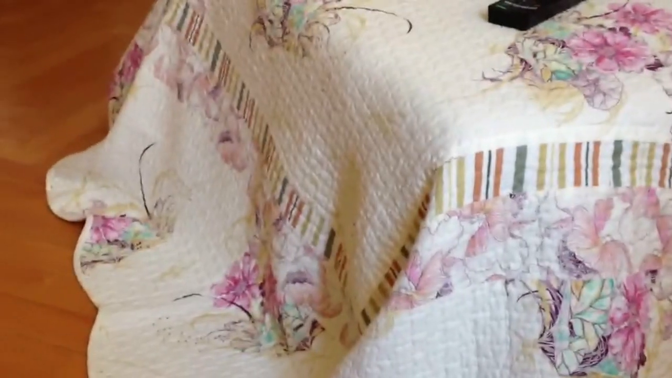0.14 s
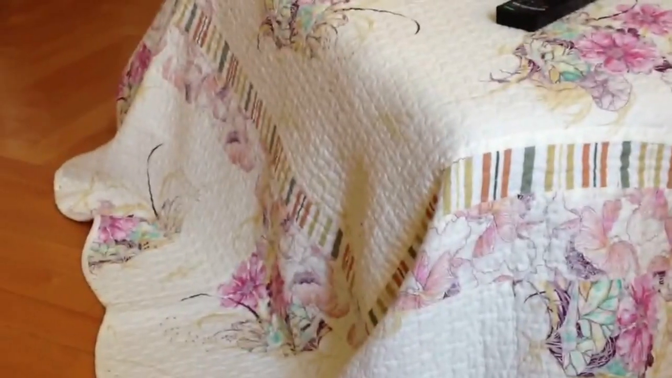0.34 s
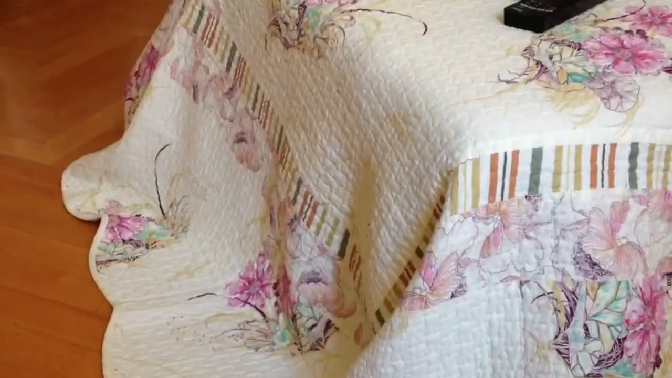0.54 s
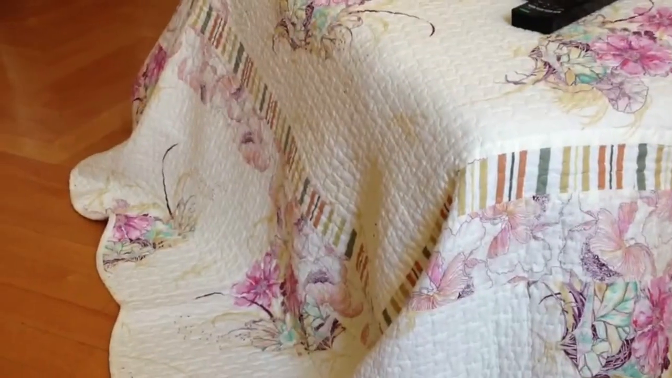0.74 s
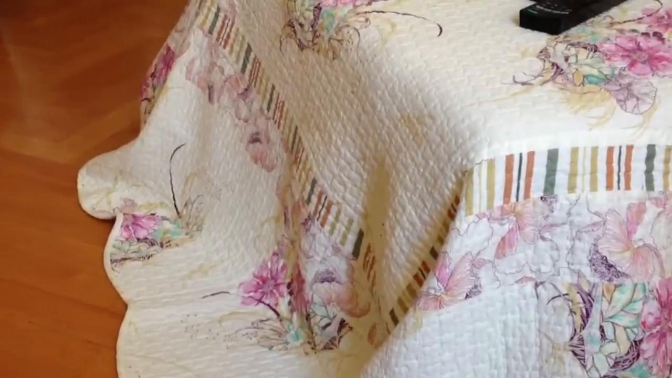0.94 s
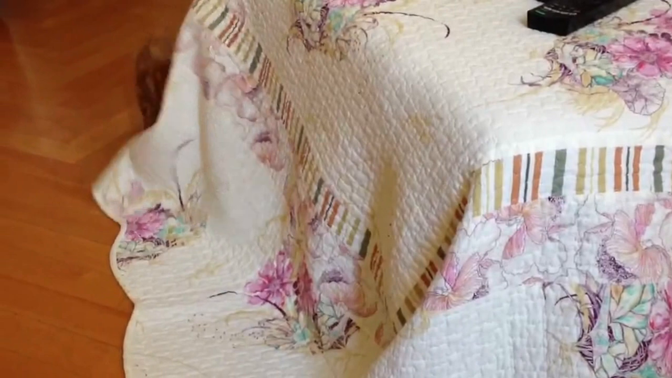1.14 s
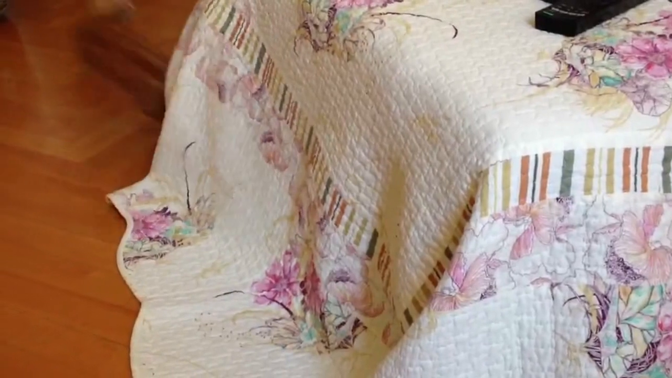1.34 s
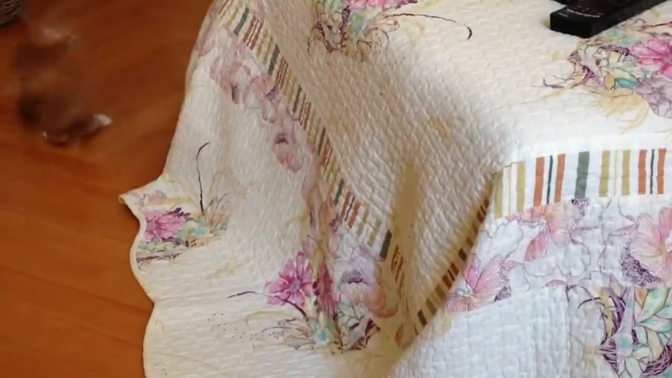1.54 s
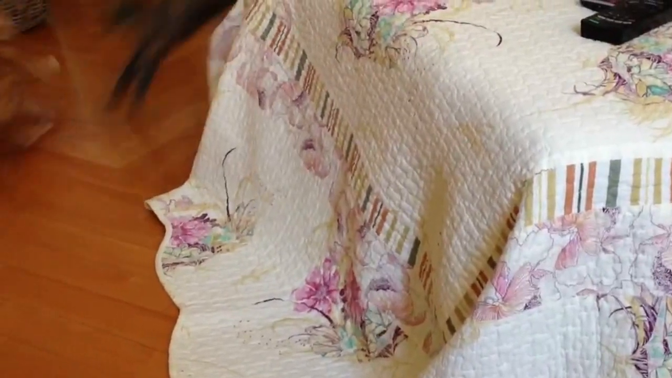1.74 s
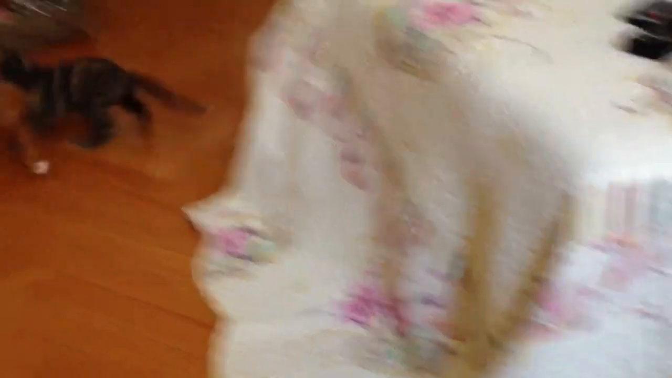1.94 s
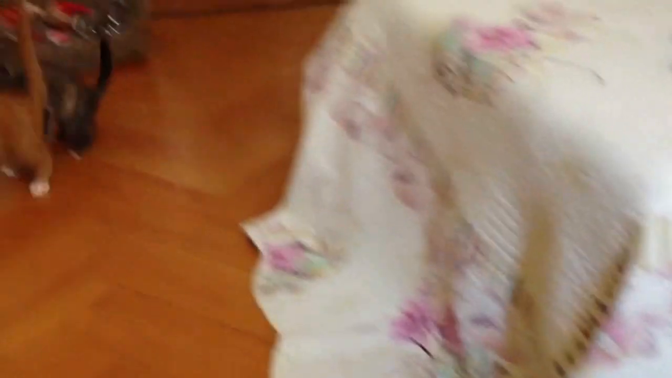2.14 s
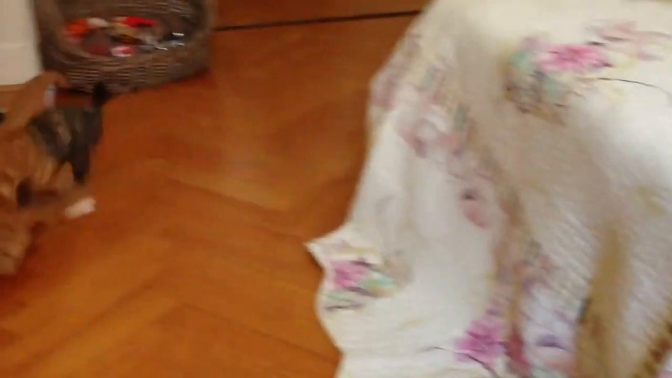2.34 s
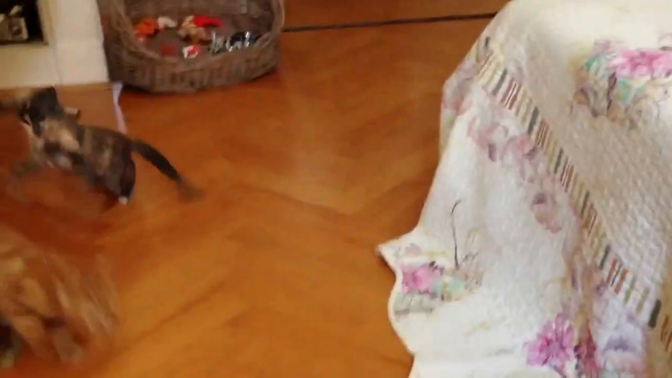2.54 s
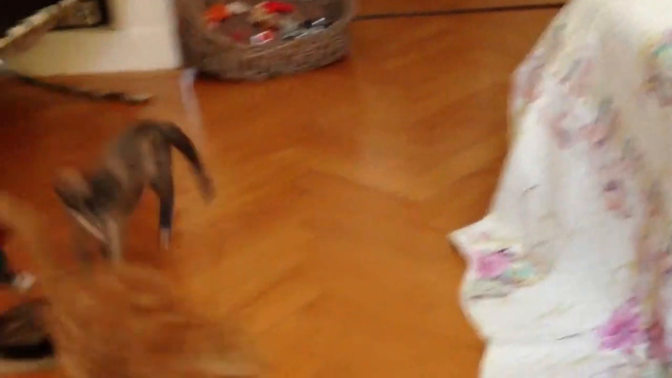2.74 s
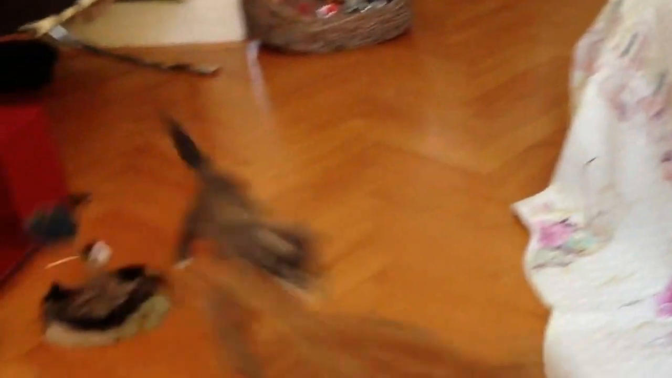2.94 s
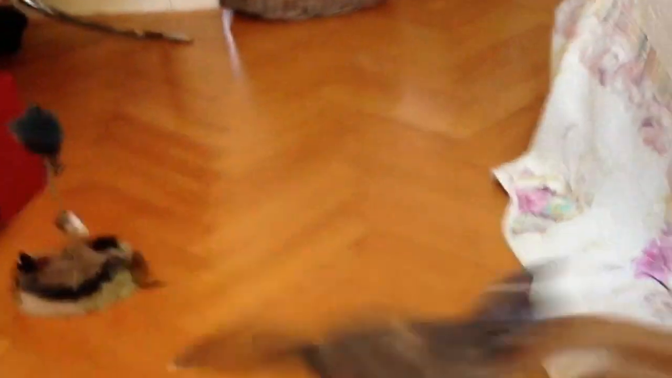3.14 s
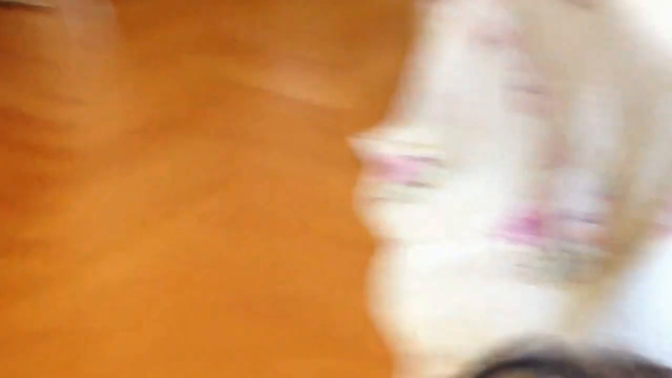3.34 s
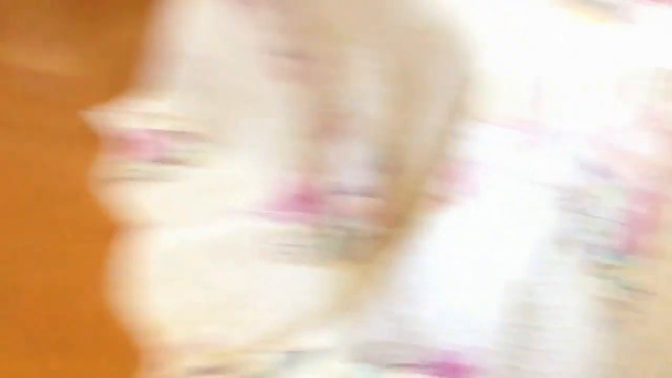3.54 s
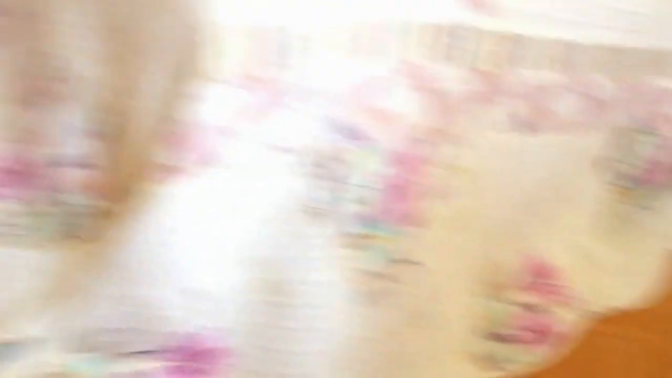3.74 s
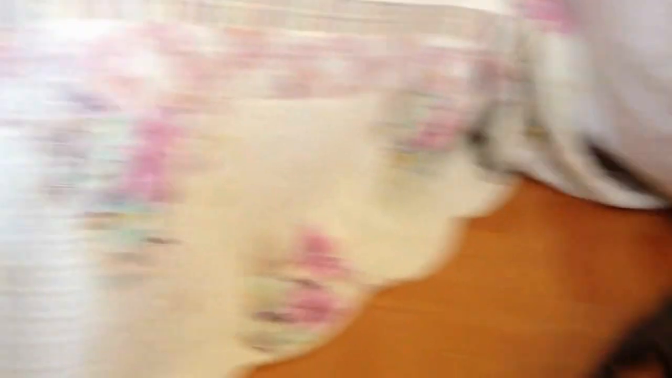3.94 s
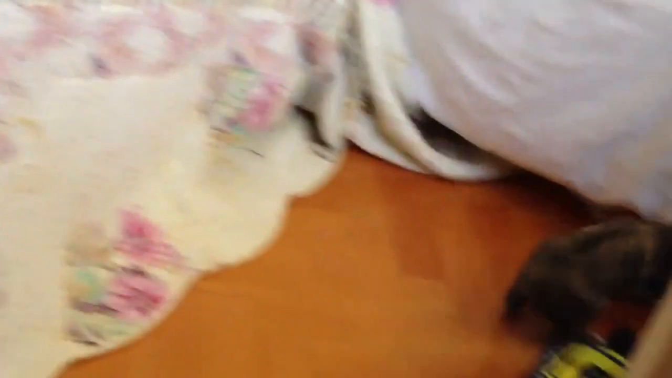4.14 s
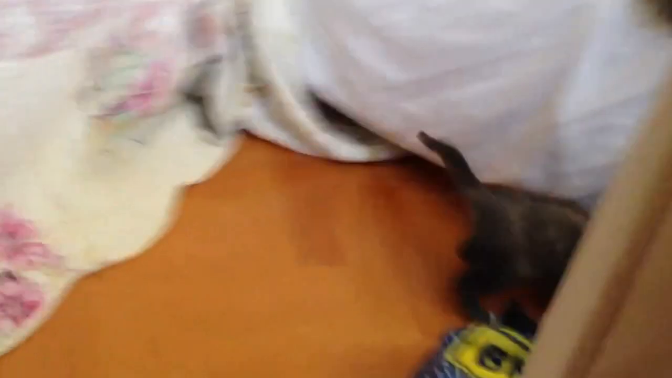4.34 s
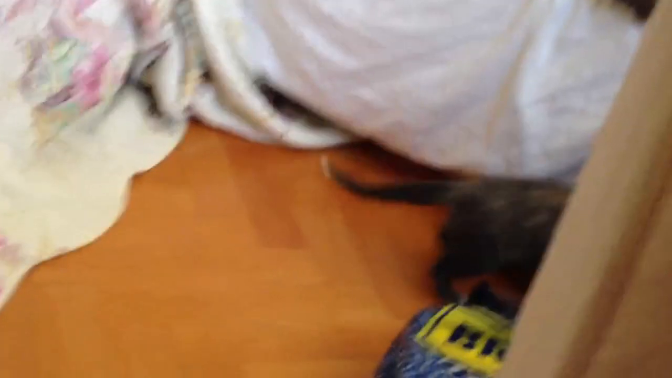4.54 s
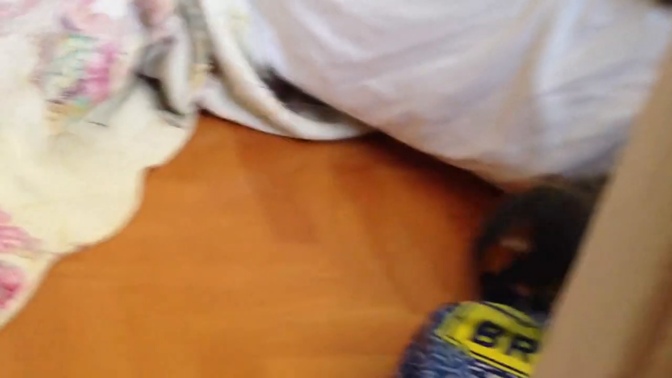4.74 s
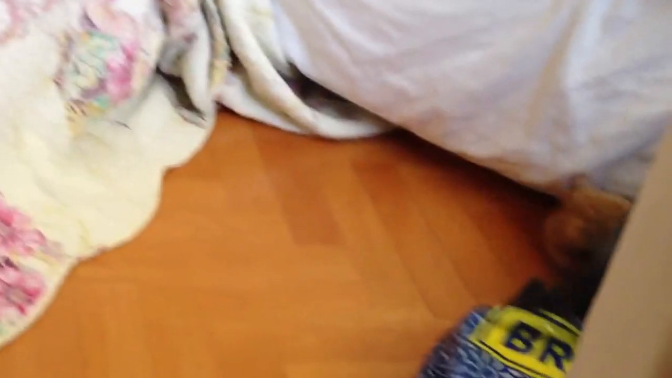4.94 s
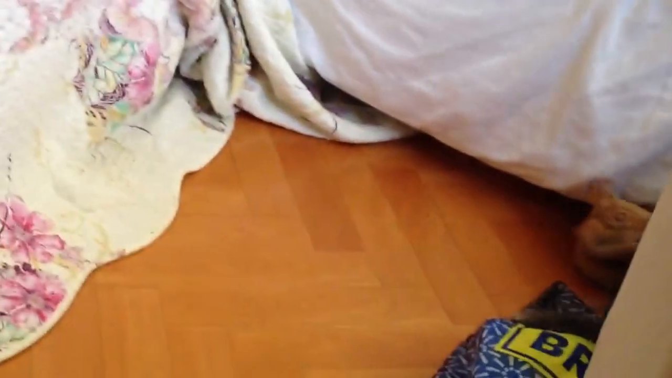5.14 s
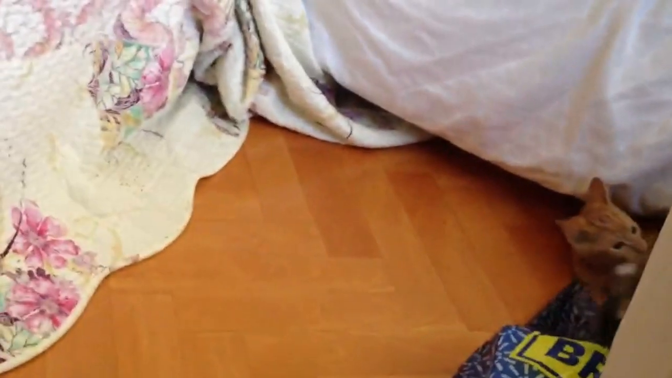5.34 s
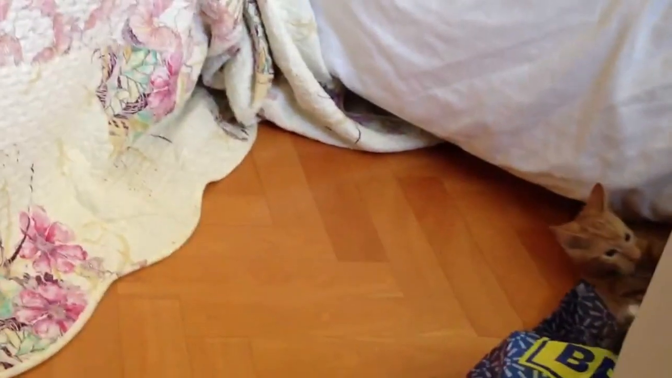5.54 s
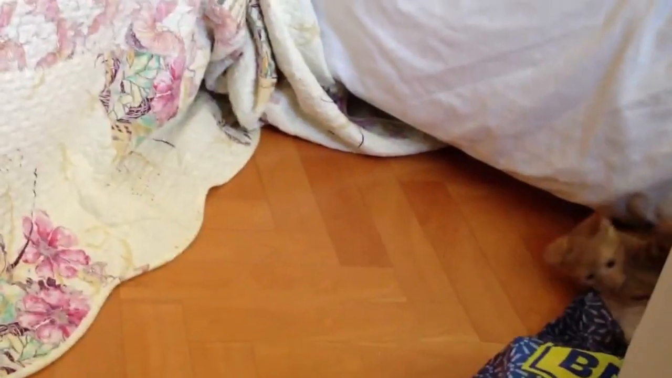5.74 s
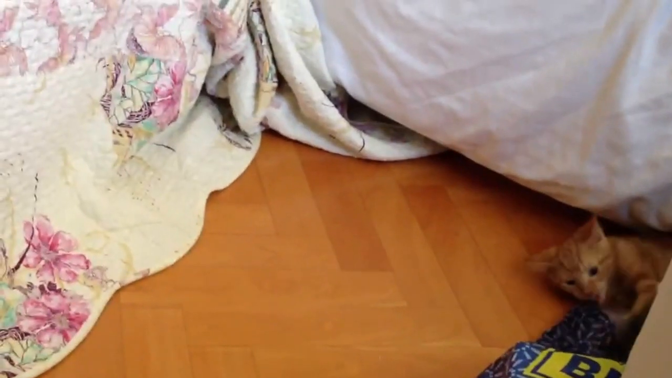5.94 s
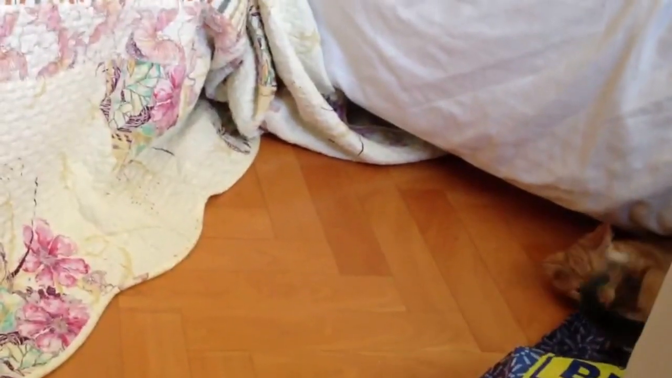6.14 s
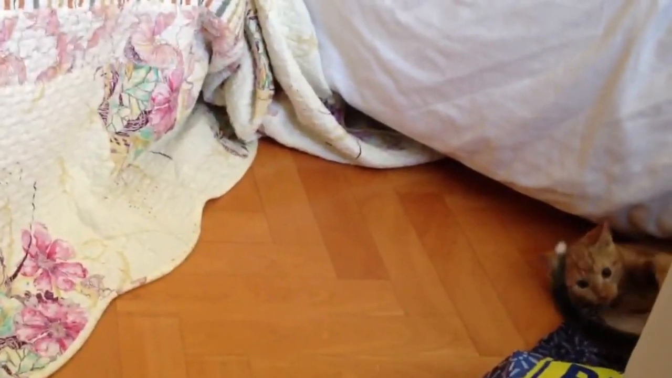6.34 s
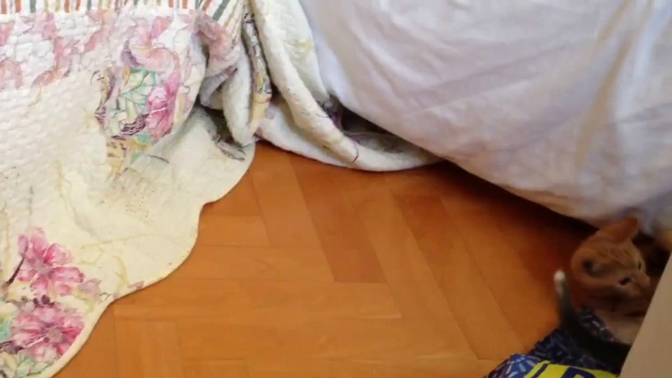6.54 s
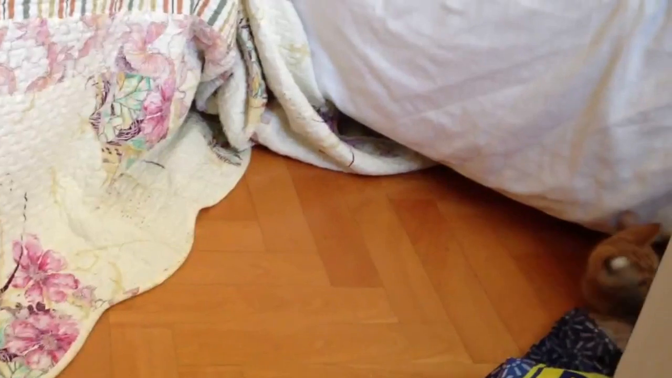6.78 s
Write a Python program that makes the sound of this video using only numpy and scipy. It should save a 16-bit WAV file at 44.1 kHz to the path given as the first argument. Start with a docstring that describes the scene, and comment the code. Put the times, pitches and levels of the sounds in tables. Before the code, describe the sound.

A small, quiet room with a parquet floor and short reverberation, picked up by a camera's small microphone over low, steady hiss. In the first 0.4 s, three faint finger taps touch the camera body; then just hiss. From about 1.05 s kittens burst out: thin claw scratches, quilt tugs and a flurry of rapping paws. The steps thin, then hit harder in a cluster at 1.8-1.95 s. Lighter, scattered steps follow, with more scratches near 2.7 s. From 2.64 s, crisp, bright cloth snaps and threadlike rustling come close, over galloping thuds; a short hoarse skid squeaks at 2.93 s. The strongest cloth crack and rub comes around 3.64 s, among heavier landings until 3.9 s. Cloth crackles fade by 4.6 s. Soft swishes swell around 4.9-5.5 s and 5.95 s, with isolated ticks and one faint knock. Muffled finger taps patter at 6.1-6.55 s, ending in hiss.

```python
"""A small, quiet room with a parquet floor, heard through a camera's small microphone over steady hiss.
First fingers tap faintly on the camera body: a few struck modes. Kittens then burst out from under a
quilt and gallop over the floor: shaped noise for claws, ringing boards for pads, grains for cloth.
Cloth drags close by as the camera turns after them, and a paw skids once: a gliding, uneven tone.
Last come soft swishes of fine grains, a few cloth ticks and more finger taps."""
import sys
import numpy as np
from scipy import signal
from scipy.fft import rfft, irfft
from scipy.io import wavfile

SR = 44100
rng = np.random.default_rng(int(sys.argv[2]) if len(sys.argv) > 2 else 0)


def log_audio(samples):
    """Write samples as a 16-bit WAV file to the path given in sys.argv[1]."""
    # one column per channel
    frames = np.atleast_2d(samples).T
    # limit to full scale, then quantise
    limited = np.clip(frames, -1, 1)
    pcm = np.round(limited * 32767).astype(np.int16)
    wavfile.write(sys.argv[1], SR, pcm)


N = 300321
TIME = np.arange(N) / SR

# Event levels in the tables are before each function's own trims; spectra are relative.


def amp(db):
    """Decibels to gain."""
    return 10 ** (np.asarray(db) / 20)


def unit(x):
    """Scales to rms 1."""
    return x / np.sqrt(np.mean(x ** 2) + 1e-20)


def read(points, hz):
    """Reads a table on a log-frequency axis."""
    f, value = np.transpose(points)
    return np.interp(np.log(hz + 1), np.log(f), value)


def level(rows, axis=1):
    """Gain over time from a column of dB, practically silent outside its span."""
    rows = np.asarray(rows)
    return amp(np.interp(TIME, rows[:, 0], rows[:, axis], left=-140, right=-140))


def strokes(rows):
    """Gain of strokes that swell to a peak and die away, evenly in dB; their powers add."""
    power = 0
    for s, db, rise, fall in rows:
        twenties_below_peak = np.maximum((s - TIME) / rise, (TIME - s) / fall).clip(0, 10)
        power = power + amp(db - 20 * twenties_below_peak) ** 2
    return np.sqrt(power)


def add(mix, s, sound):
    """Mixes a sound in at s seconds."""
    part = mix[max(round(s * SR), 0):][:len(sound)]
    part += sound[:len(part)]


def colour(x, points, centre_hz=1000, focus_db=0):
    """Gives x a spectrum, optionally gathered round a centre (dB lost per octave squared); rms 1."""
    hz = np.fft.rfftfreq(len(x), 1 / SR)
    octaves = np.log2((hz + 1) / centre_hz)
    gain = amp(read(points, hz) - focus_db * octaves ** 2)
    return unit(irfft(rfft(x) * gain, len(x)))


def wander(rate_hz):
    """Smooth random drift of rms 1, its spectrum falling away towards and above the rate."""
    hz = np.fft.rfftfreq(N, 1 / SR)
    return unit(irfft(rfft(rng.standard_normal(N)) * np.exp(-(hz / rate_hz) ** 2), N))


def grains(per_s, spread_db):
    """Random clicks, rms 1: a positive spread makes a few larger, a negative one a few smaller."""
    size = amp(spread_db * np.minimum(rng.exponential(1, N), 5))
    return unit(size * rng.choice([-1, 1], N) * (rng.random(N) < per_s / SR))


def ring(modes, t):
    """A struck body's modes, each dying by 60 dB in its t60."""
    return sum(amp(db - 60 * t / t60) * np.sin(2 * np.pi * hz * t) for hz, db, t60 in modes)


# finger taps on the camera body, at the microphone: t/s, level/dB, centre f/Hz
FINGER_TAPS = [(0.048, -54, 889.7), (0.152, -56.5, 803.8), (0.386, -61.5, 843), (6.079, -62.5, 623.4),
               (6.112, -59.5, 346.6), (6.194, -58.5, 357), (6.218, -67, 310), (6.244, -64, 328),
               (6.258, -63, 344.4), (6.286, -64.5, 353), (6.331, -61.5, 303.7), (6.548, -64, 1100)]
# modes of the camera body: f/Hz, level/dB, t60/s
CAMERA_MODES = [(366.84, 2, 0.02712), (560.48, 5.5, 0.02378), (811.49, 7.5, 0.02357),
                (921.23, -5.5, 0.0272), (1707, -5, 0.0267)]


def taps(gain_db=3, focus_db=7, rise=0.002394):
    """Fingers shift on the camera body, which rings briefly; each centre favours the modes near it."""
    out, t = np.zeros(N), np.arange(4096) / SR
    for s, db, centre_hz in FINGER_TAPS:
        modes = [(hz, mode_db - focus_db * np.log2(hz / centre_hz) ** 2, t60)
                 for hz, mode_db, t60 in CAMERA_MODES]
        tap = ring(modes, t) * (1 - np.exp(-t / rise))
        add(out, s, amp(db + gain_db) * tap / abs(tap).max())
    return out


# level of the murmur of many light steps, out on the parquet: t/s, level/dB
SCAMPER_LEVEL = [(1.02, -83), (1.13, -57), (1.7, -55), (2.3, -53.5), (2.95, -52), (3.35, -59), (3.9, -55),
                 (4.2, -76), (4.7, -77)]
# modes of the parquet, also stirred by the thuds: f/Hz, level/dB, undamped t60/s
FLOOR_MODES = [(80, -8, .45), (98, -2, 0.16914), (128.58, -4, 0.07), (159, -1, 0.085), (208, 2, 0.1),
               (263.13, 0, 0.11272), (317.09, -0.5, 0.10643), (388, 1, 0.086), (490, -10, 0.1535),
               (667.97, 0, 0.10548)]
# spectrum of claws and quilt, also used for scratches and tugs: f/Hz, level/dB
CLAW_AND_QUILT_TONE = [(100, 14.5), (300, -9), (1500, 1.5), (3000, 2.5), (4500, 2), (5500, -0.5),
                       (9000, -5), (15000, -7)]


def scamper(gain_db=-5, claws_db=-13):
    """Many light steps keep the floor murmuring, and their claws tick faintly on the varnish."""
    boards = [(hz, db, t60 / 2) for hz, db, t60 in FLOOR_MODES]  # damped by the feet that stand on them
    footfalls = grains(per_s=110, spread_db=0.5)
    steps = signal.fftconvolve(footfalls, ring(boards, np.arange(8192) / SR))[:N]
    claws = colour(grains(per_s=2500, spread_db=3), CLAW_AND_QUILT_TONE)
    return amp(gain_db) * level(SCAMPER_LEVEL) * (unit(steps) + amp(claws_db) * claws)


# claws scratching along the varnish, further off: peak t/s, level/dB, centre f/Hz
CLAW_SCRATCHES = [(1.064, -59, 4100), (1.103, -56, 4300), (1.16, -53, 1350), (1.186, -55, 2600),
                  (1.315, -57, 3400), (2.668, -55, 2650), (2.763, -51, 3500)]
SCRATCH_RISE_S, SCRATCH_FALL_S = .02, .05  # times for 20 dB


def scratches(focus_db=90):
    """A claw tip skips along the grain and rings in a narrow band: a thin, hoarse note."""
    out = np.zeros(N)
    for s, db, hz in CLAW_SCRATCHES:
        stroke = strokes([(s, db, SCRATCH_RISE_S, SCRATCH_FALL_S)])
        skips = grains(per_s=1500, spread_db=2.5)
        out += stroke * colour(skips, CLAW_AND_QUILT_TONE, hz, focus_db)
    return out


# short, sharp cracks: cloth folds close by, and two early claw scratches (1.064 s and 1.4998 s):
# t/s, level/dB, centre f/Hz
SHARP_CRACKS = [(1.064, -51, 4000), (1.1403, -37, 2800), (1.4998, -46, 4010), (2.6197, -42, 6647),
                (2.642, -21, 13210), (2.6492, -29, 11110), (2.6642, -28.5, 9033), (2.7512, -32, 10910),
                (2.7615, -30, 8000), (2.869, -29, 10360), (2.931, -30, 9500), (2.9477, -20, 9500),
                (2.9762, -26, 10860), (3.023, -28.5, 9086), (3.1395, -29, 8812), (3.197, -28.5, 11310),
                (3.4883, -34, 8762), (3.57, -37, 9500), (3.619, -27, 4218), (3.642, -17.5, 5200),
                (3.6657, -28.5, 3950), (3.7164, -32, 9600), (4.032, -34, 7060), (4.2052, -32, 8429),
                (4.2787, -42, 9280), (4.3336, -40, 7410), (4.4144, -46, 5515), (4.5406, -49.5, 9940),
                (4.6618, -48, 6664), (4.806, -51, 10800), (4.8376, -42, 4375), (5.3732, -45, 4667),
                (5.4595, -34, 7925), (5.7409, -45, 7913), (6.117, -47.5, 10900), (6.6333, -48, 12300)]
# spectrum of the cloth, also used for the swishes: f/Hz, level/dB
CLOTH_TONE = [(50, -12.5), (180, 1), (300, 0), (420, -6), (680, 2.5), (1100, -3), (2000, 0.5), (3600, 4),
              (4600, 6.5), (5600, 4), (7500, 3.5), (11000, 0.5), (15500, 1.5)]
CRACK_T60_S = 0.020207


def snaps(gain_db=-5, focus_db=6, spread_db=1.5):
    """A fold lets go or, twice early on, a claw scratches: a sharp crack within a tight, dying burst."""
    out, t = np.zeros(N), np.arange(4096) / SR
    crack = amp(13) * signal.unit_impulse(len(t), 30)
    for s, db, hz in SHARP_CRACKS:
        sizes = amp(spread_db * rng.exponential(1, len(t)).clip(0, 4))
        clicks = unit(rng.choice([-1, 1], len(t)) * sizes)
        fade = amp(db + gain_db - 60 * t / CRACK_T60_S)
        add(out, s, colour(crack + clicks, CLOTH_TONE, hz, focus_db) * fade)
    return out


# kittens tugging at the quilt, further off: peak t/s, level/dB, time to rise 20 dB/s
QUILT_TUGS = [(1.11, -61, 0.0321), (1.155, -52.5, 0.0388), (1.305, -55.5, 0.0337), (1.4, -65.5, 0.001),
              (1.534, -53, 0.0417), (1.685, -58.5, 0.0403), (1.848, -57.5, 0.0495), (1.92, -61, 0.0597),
              (1.99, -62.5, 0.0205), (2.55, -63, 0.1819), (2.6, -68, 0.25)]
TUG_FALL_S = 0.17918  # the quilt settles by 20 dB in this time


def quilt(gain_db=2, catch_db=2, claws_db=-4):
    """With each tug the hanging quilt brushes unevenly over fur and floor, and claws pluck at it."""
    plucks = grains(per_s=260, spread_db=3.5)
    brushes = grains(per_s=4000, spread_db=-1.5)
    brushing = colour(brushes + amp(claws_db) * plucks, CLAW_AND_QUILT_TONE)
    tugging = strokes([(s, db, rise, TUG_FALL_S) for s, db, rise in QUILT_TUGS])
    return amp(gain_db + catch_db * wander(rate_hz=75.4)) * tugging * brushing


# paws landing out on the parquet, for knocks and thuds:
# t/s, knock level/dB, knock centre f/Hz, thud level/dB, thud centre f/Hz
PAW_LANDINGS = [(1.141, -30, 1254, -49, 330), (1.204, -38, 950, -50, 230), (1.283, -42, 803, -46, 251.5),
                (1.297, -34.5, 1100, -52.5, 216.3), (1.319, -36, 980, -45.5, 128.1),
                (1.389, -44.5, 1900, -51, 210.9), (1.512, -48, 2000, -50, 259.5),
                (1.573, -45, 931.6, -53.5, 357.8), (1.597, -61.5, 1090, -48, 163.1),
                (1.821, -38, 1300, -48, 413.8), (1.842, -29.5, 690.3, -35, 360.9),
                (1.85, -28.5, 1500, -41, 386.1), (1.863, -51.5, 929, -36.5, 152.2),
                (1.915, -25.5, 1400, -39.5, 388.4), (1.939, -36, 600, -35.5, 170),
                (2.183, -44, 1200, -53, 175), (2.199, -46, 1200, -53, 250), (2.293, -41, 1200, -52, 190),
                (2.376, -38.5, 1900, -50, 290), (2.508, -50, 720, -54, 395),
                (2.543, -32, 888.5, -44.5, 400.4), (2.702, -39, 1100, -48, 340),
                (2.806, -31, 1000, -44, 194.9), (2.829, -37, 755, -41, 350), (2.862, -48, 700, -45, 220),
                (2.929, -37, 800, -56, 200), (3.017, -41, 748, -45, 202.2),
                (3.072, -51.5, 824, -46.5, 164.9), (3.114, -40, 3200, -63.5, 158.8),
                (3.217, -39, 750, -50, 202.9), (3.249, -51, 775, -44, 186.9), (3.421, -37.5, 967, -35, 215),
                (3.519, -38, 1200, -45, 213.2), (3.533, -43, 752, -38, 195), (3.629, -35, 2800, -43, 380),
                (3.647, -29, 650, -37, 330), (3.8, -35, 1507, -36, 297.5), (3.89, -34, 1159, -34.5, 270),
                (3.91, -31, 850, -48, 359.9), (4.29, -62, 2000, -57, 159.1), (5.225, -49, 904, -52, 190)]
# spectrum of a rap on wood, also used for the skid's scrape: f/Hz, level/dB
KNOCK_TONE = [(100, -11.5), (400, -1), (700, 6), (900, 3), (1350, 2), (1900, 5.5), (2600, -4), (3600, -13),
              (6000, -22), (15000, -38)]
KNOCK_T60_S = 0.027172
# the board under a claw rings at this many random pitches, within this range
BOARD_COUNT = 14
BOARD_LOW_HZ, BOARD_HIGH_HZ, BOARD_DB = 451.38, 3498.9, -0.5


def knocks(gain_db=-3, focus_db=3, rise=0.0005464, contact_db=19):
    """Claws and toes rap the wood: one contact and a short, hard clatter with the ring of that board."""
    out, t = np.zeros(N), np.arange(4096) / SR
    contact = amp(contact_db) * signal.unit_impulse(len(t), 60)
    fade = amp(-60 * t / KNOCK_T60_S) * (1 - np.exp(-t / rise))
    for s, db, hz, _, _ in PAW_LANDINGS:
        pitches = BOARD_LOW_HZ * (BOARD_HIGH_HZ / BOARD_LOW_HZ) ** rng.random(BOARD_COUNT)
        board = np.sin(2 * np.pi * (pitches * t[:, None] + rng.random(BOARD_COUNT))).sum(1)
        clatter = colour(contact + rng.standard_normal(len(t)), KNOCK_TONE, hz, focus_db)
        clatter += amp(BOARD_DB) * colour(board, KNOCK_TONE, hz, focus_db)
        add(out, s, amp(db + gain_db) * unit(clatter * fade) * np.sqrt(np.mean(fade ** 2)))
    return out


def thuds(gain_db=-14, board_t60_at_200_hz=0.07338, floor_db=-5, focus_db=6, press=0.004585):
    """A soft pad loads one board, which booms at its own pitch and stirs the floor's nearest modes."""
    out, t = np.zeros(N), np.arange(8192) / SR
    for s, *_, db, centre_hz in PAW_LANDINGS:
        board = ring([(centre_hz, 0, board_t60_at_200_hz * np.sqrt(200 / centre_hz))], t)
        shifts = rng.uniform(.9, 1.1, len(FLOOR_MODES))  # each landing finds the modes slightly detuned
        floor = ring([(hz * shift, mode_db - focus_db * np.log2(hz / centre_hz) ** 2, t60)
                      for (hz, mode_db, t60), shift in zip(FLOOR_MODES, shifts)], t)
        loading = 1 - np.exp(-t / press)
        add(out, s, amp(db + gain_db) * unit((board + amp(floor_db) * floor) * loading))
    return out


# cloth dragging close by the camera as it swings round: t/s, thread hiss level/dB, pressed rub level/dB
CLOTH_DRAG = [(2.64, -59, -76.5), (2.73, -48, -64), (2.86, -43.5, -49), (2.92, -46.5, -56),
              (2.95, -32.5, -52), (3.05, -42, -64), (3.37, -47, -75), (3.55, -50.5, -70), (3.6, -47.5, -63),
              (3.635, -31.5, -34), (3.69, -35.5, -40.5), (3.79, -34.5, -41), (3.93, -46.5, -46.5),
              (3.99, -39, -44), (4.09, -51, -55), (4.38, -55.5, -59.5), (4.56, -69, -74), (4.8, -73, -71.5)]
# spectrum of the threads: f/Hz, level/dB
THREAD_TONE = [(600, -37.5), (2000, -8), (3300, -8.5), (5000, -4.5), (6200, -0.5), (8200, 3), (11000, 1),
               (14000, 1), (16000, 2)]
# spectrum of the pressed cloth: f/Hz, level/dB
RUB_TONE = [(50, -3), (170, 1), (330, -1.5), (480, -11), (720, 2.5), (950, 0), (2200, 0.5), (3100, 1),
            (4200, 5.5), (6000, -2.5), (12000, -9.5)]
# threads stir after each snap: level relative to it, times for 20 dB
CRUMPLE_DB, CRUMPLE_RISE_S, CRUMPLE_FALL_S = -15.5, 0.00311, .05


def near_cloth(hiss_db=-0.5, rub_db=-1, catch_db=1.5):
    """Threads catch and slip in thousands of tiny clicks, over the duller rub of pressed cloth."""
    catching = amp(catch_db * wander(rate_hz=86.3))
    flecks = amp(-8.5) * grains(per_s=160, spread_db=3)
    crumpling = strokes([(s, db + CRUMPLE_DB, CRUMPLE_RISE_S, CRUMPLE_FALL_S)
                         for s, db, _ in SHARP_CRACKS if s > CLOTH_DRAG[0][0]])  # snaps since the drag began
    threads = colour(grains(per_s=16000, spread_db=4.0) + flecks, THREAD_TONE)
    threads = threads * np.hypot(level(CLOTH_DRAG), crumpling)
    rub = colour(grains(per_s=12000, spread_db=4.0), RUB_TONE) * level(CLOTH_DRAG, axis=2)
    return catching * (amp(hiss_db) * threads + amp(rub_db) * rub)


# one paw skidding on the varnish, further off
SKID_START_S, SKID_LENGTH_S, SKID_DB = 2.928, 0.10001, -50
# the chatter rises as the paw grips, then dies by 20 dB in the fall time
SKID_START_HZ, SKID_END_HZ, SKID_FALL_S = 716.44, 780.92, .08


def skid(scrape_db=-3.5, judder_db=2):
    """A pad sticks and slips unevenly: a short, hoarse squeak over a scrape."""
    t = TIME - SKID_START_S
    pitch = np.interp(t, [0, SKID_LENGTH_S], [SKID_START_HZ, SKID_END_HZ])
    phase = 2 * np.pi * np.cumsum(pitch) / SR
    grip = .6 + wander(rate_hz=130) + 1j * wander(rate_hz=130)  # unsteady in strength and phase
    chatter = unit((np.exp(1j * phase) * grip / np.sqrt(abs(grip))).real)
    scrape = colour(grains(per_s=590, spread_db=0.5), KNOCK_TONE, centre_hz=680, focus_db=9)
    fall_db = 20 * np.maximum(t - SKID_LENGTH_S, 0) / SKID_FALL_S
    sliding = (t > 0) * amp(SKID_DB + judder_db * wander(rate_hz=68.7) - fall_db)
    return sliding * (chatter + amp(scrape_db) * scrape)


# slow, smooth strokes of cloth on cloth, close by:
# peak t/s, level/dB, time to rise 20 dB/s, time to fall 20 dB/s
CLOTH_SWISHES = [(4.858, -45, 0.0465, 0.0841), (4.94, -51.5, 0.0951, 0.1771), (5.06, -47, .12, 0.2377),
                 (5.185, -40, .22, .13), (5.4, -51.5, .04, 0.2431), (5.455, -51, 0.178, 0.1362),
                 (5.78, -58.5, 0.1852, 0.3382), (5.95, -47, 0.2493, 0.1799), (6.01, -52.5, 0.1372, 0.2235),
                 (6.5, -70, 0.1685, 0.1934), (6.62, -65, 0.0907, 0.0373)]


def swishes(catch_db=0.9776):
    """Sliding slowly, the weave makes finer and more even grains."""
    weave = colour(grains(per_s=26000, spread_db=2.5), CLOTH_TONE)
    return amp(catch_db * wander(rate_hz=85.6)) * strokes(CLOTH_SWISHES) * weave


# decay of the small room: f/Hz, t60/s
ROOM_DECAY = [(100, 0.3784), (300, 0.40625), (1000, 0.41827), (4000, 0.3285), (14000, 0.1806)]


def room(x, gap=.004):
    """Dense reflections after a short gap, each band dying at its own speed."""
    t = np.arange(SR) / SR
    reflections = rng.choice([-1., 1.], SR) * (rng.random(SR) < .1) * (t > gap)
    hz, when, z = signal.stft(reflections, SR, nperseg=256)
    decay = amp(-60 * when / read(ROOM_DECAY, hz)[:, None])
    tail = signal.istft(z * decay, SR, nperseg=256)[1]
    return signal.fftconvolve(x, tail / np.linalg.norm(tail))[:N]


def scene():
    """Far sounds carry much of the room, near ones little; the scamper is left dry."""
    knock, thud = knocks(), thuds()
    far = quilt() + skid() + scratches()
    near = near_cloth() + swishes() + snaps() + taps()
    wet = room(amp(-6) * knock + amp(-5) * thud + amp(-11.5) * far + amp(-16.5) * near)
    return (knock + thud + far + near + scamper() + wet)[None]


# the microphone's port, a peak with a notch just above it: f/Hz, level/dB
MICROPHONE_PORT = [(30, -33), (60, -21.5), (100, -6.5), (140, 5.5), (3400, 1), (4300, 0.5), (4800, 3.5),
                   (5100, -4.5), (6200, 0.5), (13000, 1.5), (15600, -8.5)]
# spectrum of the steady background hiss: f/Hz, level/dB
BACKGROUND_TONE = [(15, -40), (25, -18), (48, -19), (126, -2.5), (349, -4), (410, -7.5), (509, -6),
                   (567, -5.5), (722, -8.5), (1400, -11.5), (1800, -13), (2770, -13.5), (5580, -13.5),
                   (10100, -19), (15500, -14)]
BACKGROUND_DB = -66.5
BAND_LIMIT_HZ = 15550


def record(dry):
    """The small microphone colours the sound over a steady floor of hiss; then the band limit."""
    log_gain = np.log(amp(read(MICROPHONE_PORT, abs(np.fft.fftfreq(8192, 1 / SR)))))
    minimum_phase = np.exp(np.conj(signal.hilbert(log_gain)))  # rings only after a sound
    port = np.fft.ifft(minimum_phase).real[:2048]
    hiss = amp(BACKGROUND_DB) * colour(rng.standard_normal(N), BACKGROUND_TONE)
    heard = signal.oaconvolve(dry, port[None])[:, :N] + hiss
    band_limit = signal.firwin(511, BAND_LIMIT_HZ, window=("kaiser", 9), fs=SR)
    return signal.oaconvolve(heard, band_limit[None], "same")


dry = scene()
out = record(dry)
log_audio(out)
```